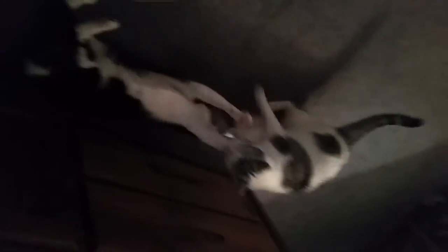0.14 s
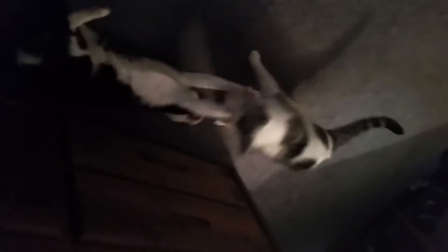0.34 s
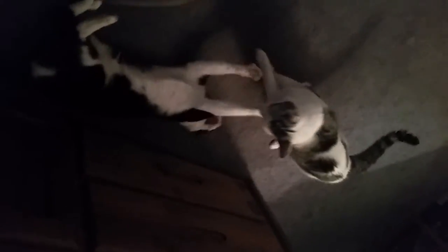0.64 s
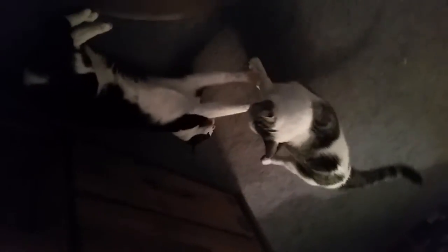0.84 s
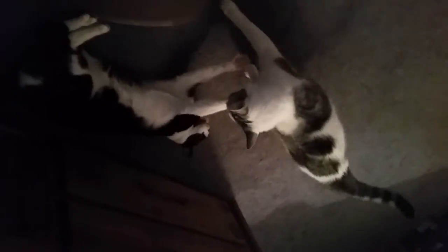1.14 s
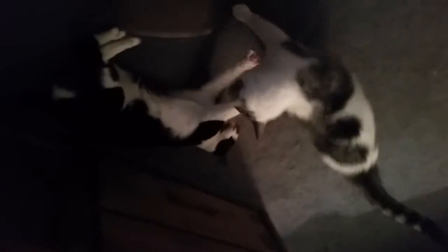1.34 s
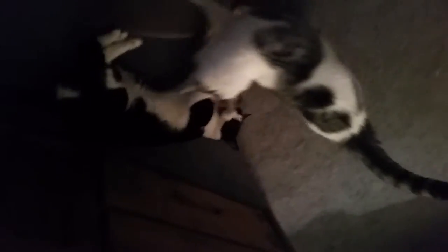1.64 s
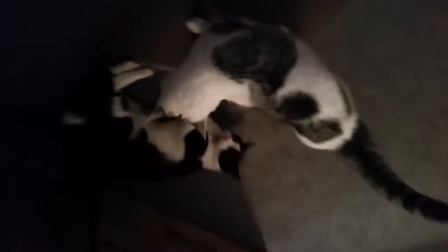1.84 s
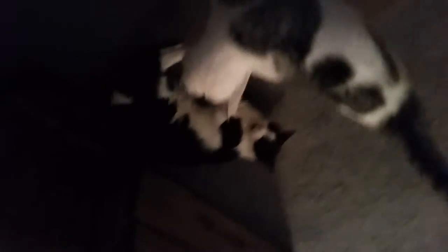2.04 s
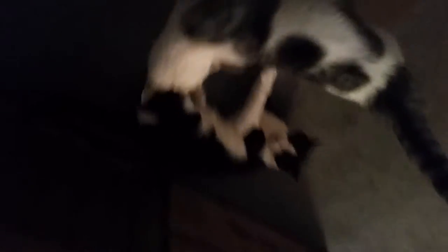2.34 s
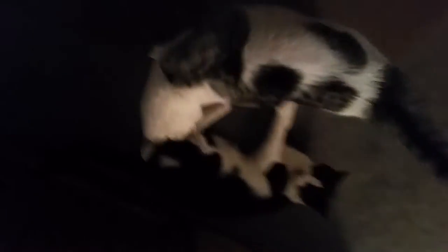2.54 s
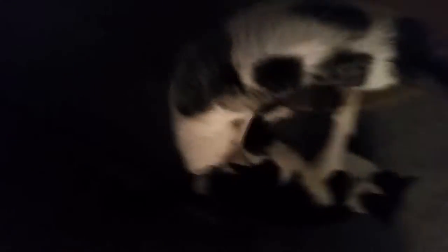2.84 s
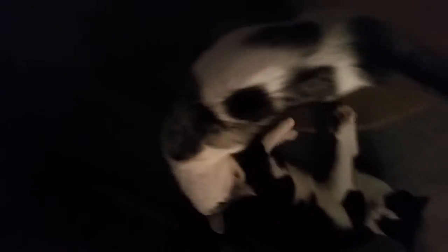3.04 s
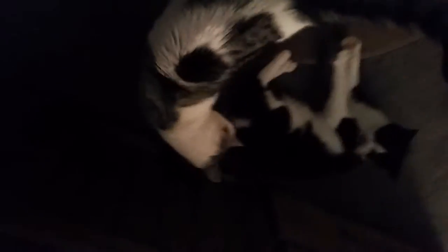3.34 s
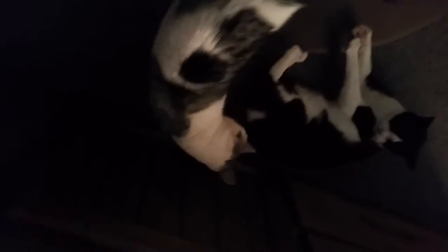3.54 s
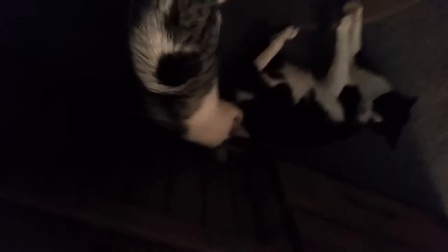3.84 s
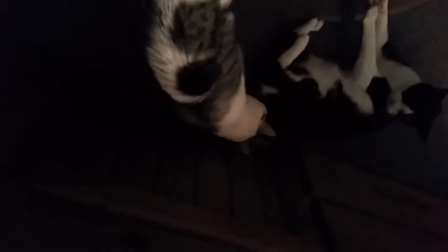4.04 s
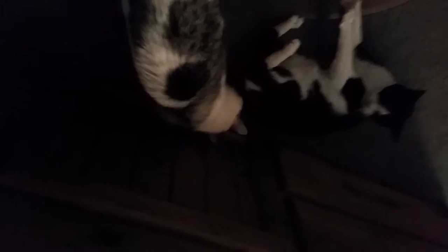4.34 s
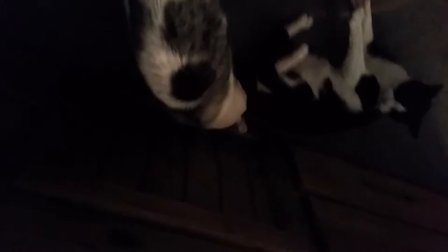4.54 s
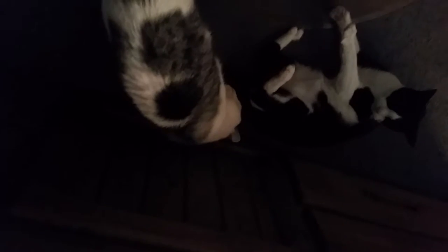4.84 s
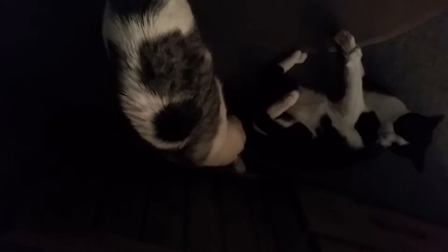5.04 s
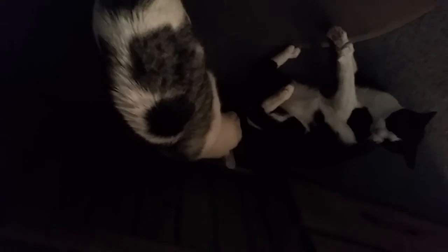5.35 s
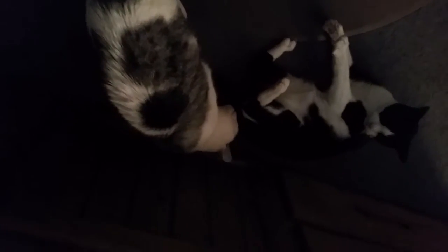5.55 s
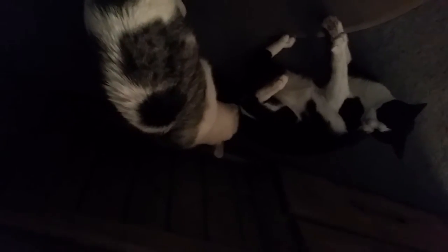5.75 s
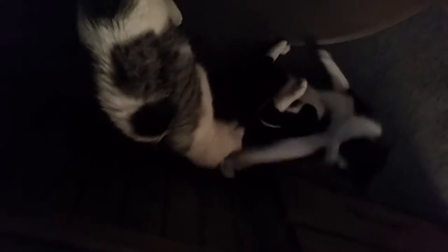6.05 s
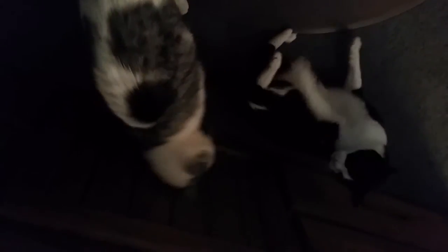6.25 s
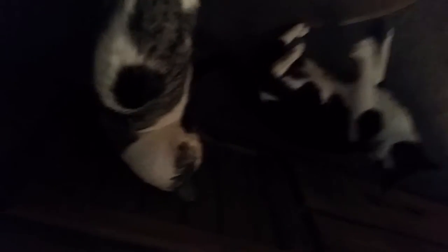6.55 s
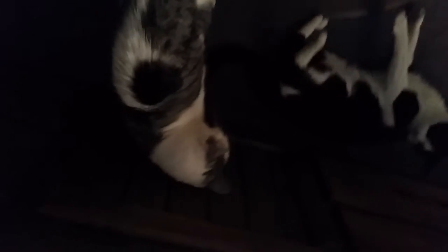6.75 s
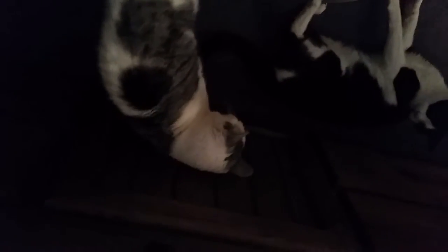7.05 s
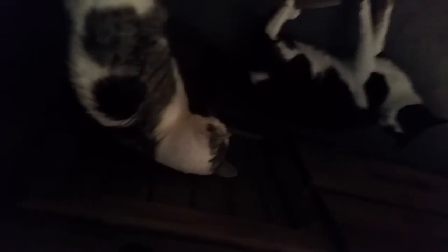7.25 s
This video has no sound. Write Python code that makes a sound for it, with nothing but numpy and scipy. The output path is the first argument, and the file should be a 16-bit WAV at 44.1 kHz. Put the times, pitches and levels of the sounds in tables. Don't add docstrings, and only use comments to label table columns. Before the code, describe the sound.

Loud muffled thumps and popping finger bumps on a hand-held microphone, over faint fur rustles and carpet scrapes of two scuffling cats and a low hum.

```python
import sys
import numpy as np
from scipy import signal
from scipy.fft import rfft, irfft, next_fast_len
from scipy.io import wavfile
from scipy.ndimage import uniform_filter1d

SR = 44100
rng = np.random.default_rng(int(sys.argv[2]) if len(sys.argv) > 2 else 0)


def voltage_ratio(level):
    return 10 ** (np.asarray(level, float) / 20)


def wrap_up_sound(samples):
    columns = np.atleast_2d(samples).T
    tamed = np.clip(columns, -1, 1)
    steps = np.round(tamed * 32767).astype(np.int16)
    wavfile.write(sys.argv[1], SR, steps)


N = 326340
PORT_GAP_SAMPLES = 8


def evened(x):
    return x / np.sqrt(np.mean(x ** 2) + 1e-20)


def read(points, hz):
    f, value = np.transpose(points)
    return np.interp(np.log(hz + 1), np.log(f + 1), value)


def add(mix, start_s, sound):
    part = mix[round(start_s * SR):][:len(sound)]
    part += sound[:len(part)]


def drift(top_hz):
    t = np.arange(0, N, 64) / SR
    waves = sum(np.sin(2 * np.pi * (f * t + rng.random())) / np.sqrt(f)
                for f in np.geomspace(.2, top_hz, 24))
    return np.interp(np.arange(N) / SR, t, evened(waves))


def resonance(x, hz, width_hz):
    return signal.lfilter(*signal.iirpeak(hz, hz / width_hz, SR), x)


def resonance_twice(x, hz, width_hz):
    return resonance(resonance(x, hz, width_hz), hz, width_hz)


def coloured(x, db_at):
    size = next_fast_len(N)
    return irfft(rfft(x, size) * voltage_ratio(db_at(np.fft.rfftfreq(size, 1 / SR))), size)[:N]


def tail(x, t60_s):
    t = np.arange(SR // 2) / SR
    echo = rng.standard_normal((2, len(t))) * voltage_ratio(-60 * t / t60_s) * (t > .004)
    return signal.oaconvolve(x[None], echo / np.linalg.norm(echo[0]), axes=1)[:, :N]


# frequency in Hz, level in dB per Hz.
AIR_SPECTRUM = [(12, -34), (20, -25), (69, -4.5), (123, 2.5), (168, -5), (224, -9.5), (365, -13),
                (520, -22.5), (742, -19.5), (1320, -34.5), (1800, -25.5), (2870, -46), (4000, -42.5),
                (5200, -64), (8800, -120)]
# frequency in Hz, level in dB.
AIR_LEFT_TILT = [(60, 0.5), (150, 0), (380, -5), (950, -2.5), (2380, -6), (5980, -7.5), (15000, 19)]
# frequency in Hz, likeness 0-1.
AIR_LIKENESS = [(60, 0), (130, 0.4), (290, 1), (640, 0.63), (1400, 0.69), (3100, 0), (8000, 0.7)]
# frequency in Hz, width in Hz, level in dB.
STANDING_WAVES = [(227, 17.6, 8.5), (293.1, 12.3, 14), (367, 6.5, 6.5), (376.6, 12, 7), (426, 19.8, 8.5),
                  (772, 17, 9.5), (894, 52, 5.5), (1807, 35, 6.5), (3585, 345, 8)]


def room_tone():
    air_db, hum_hz, hum_db = -47, 120.55, -45
    frames, hz = N // 1024 + 5, np.fft.rfftfreq(4096, 1 / SR)
    a, b, c, d, patches = rng.standard_normal((frames, 2049, 5)).T
    patches = evened(uniform_filter1d(uniform_filter1d(patches, 40, 0), 3, 1))
    modes_db = sum(db / (1 + (2 * (hz - f) / width) ** 2) for f, width, db in STANDING_WAVES)
    hum_gap_db = 14 / (1 + ((hz - hum_hz) / 30) ** 2)

    same = np.clip(read(AIR_LIKENESS, hz), -1, 1)[:, None]
    left = a + 1j * b
    own = c + 1j * d
    late = np.exp(-2j * np.pi * hz * PORT_GAP_SAMPLES / SR)[:, None]
    z = np.array([left, late * (same * left + np.sqrt(1 - same ** 2) * own)])
    z *= voltage_ratio(read(AIR_LEFT_TILT, hz) / 2 * np.array([[1], [-1]]))[:, :, None]
    z *= voltage_ratio((read(AIR_SPECTRUM, hz) + modes_db - hum_gap_db)[:, None] + 0.89 * patches)
    noise = signal.istft(z, nperseg=4096, noverlap=3072)[1][:, :N]
    air = voltage_ratio(air_db + 1.8 * drift(4.6)) * evened(noise)

    hum_phase = 2 * np.pi * np.cumsum(hum_hz + .5 * drift(4)) / SR
    hum = np.sqrt(2) * np.sin(hum_phase) * voltage_ratio(hum_db + 1.4 * drift(8))
    return air + hum * voltage_ratio([[-1.5], [.7]])


# frequency in Hz, level in dB per Hz.
DUCT_HISS = [(3000, -38), (4500, -4), (5400, -5.5), (6100, -14), (6800, -4.5), (7300, -11), (7800, -3.5),
             (8900, -5.5), (9300, -17), (10000, -7.5), (10800, -9), (11400, -4.5), (14400, -2.5)]
# frequency in Hz, level in dB.
DUCT_HISS_RIGHT = [(4500, 8.5), (8900, 6), (9500, -6), (10700, -16), (11400, -1.5)]


def port_noise():
    hiss_db, whine_hz, whine_db = -70.5, 11525, -92
    left, right = rng.standard_normal((2, N))
    left = coloured(left, lambda hz: read([(1500, -53.5), *DUCT_HISS], hz))
    right = coloured(right, lambda hz: read([(1500, -58), *DUCT_HISS], hz) + read(DUCT_HISS_RIGHT, hz))
    whine = np.sin(2 * np.pi * whine_hz * np.arange(N) / SR) * voltage_ratio(whine_db + 2 * drift(6.5))
    return voltage_ratio(hiss_db) * np.array([left, right]) / left.std() + whine


# time in seconds, rustle level in dB.
FUR_LEVEL = [(0, -58), (.9, -62), (1.69, -65), (2.1, -61), (4.0, -55.5), (4.6, -64), (4.85, -57),
             (5.0, -59), (5.2, -62), (6.26, -89), (7.4, -89)]


def rustle():
    s, db = np.transpose(FUR_LEVEL)
    brushing = resonance_twice(rng.standard_normal((2, N)), 2010, 830)
    level = voltage_ratio(np.interp(np.arange(N) / SR, s, db) - 8.0 + 0.6 * drift(13))
    return level * evened(brushing) * voltage_ratio([[-3], [3]])


# start in seconds, length in seconds, level in dB, claw whistle in dB.
PAW_STROKES = [(0.145, 0.058, -59.5, -7.5), (0.278, 0.054, -63, -17), (0.853, 0.034, -64, -6),
               (1.322, 0.067, -67, -23), (1.389, .02, -59, -22), (1.994, 0.14, -51.5, -19),
               (2.02, .006, -50, -24), (2.426, 0.093, -49, -12.5), (2.466, 0.14, -40.5, -19.5),
               (2.64, 0.041, -58, -14), (2.911, 0.054, -46.5, -22), (2.924, 0.14, -39.5, -17),
               (3.277, 0.11, -52, -8), (3.364, 0.049, -53.5, -10), (3.421, 0.059, -53.5, -5),
               (3.483, 0.15, -50, -6), (3.693, 0.13, -54.5, -12), (3.973, 0.13, -47, -13),
               (4.305, 0.14, -58, -13), (4.407, 0.14, -57.5, -17), (4.582, 0.14, -50.5, -15.5),
               (4.687, 0.14, -54.5, -14), (4.856, 0.067, -61.5, -8), (5.51, .03, -62, -20),
               (5.801, 0.0031, -47.5, -12), (6.1, 0.022, -65, -20), (7.11, .02, -68, -20),
               (7.157, .04, -67, -20)]
# frequency in Hz, level in dB per Hz.
FIBRE_SPECTRUM = [(800, -20), (1900, -4.5), (2600, -8.5), (3300, -18), (4040, -7), (5290, -17.5),
                  (6000, -12), (6980, -4), (8680, -2), (10300, -12.5), (11500, -4.5), (13800, -0.5),
                  (15000, -0.5)]
# frequency in Hz, level in dB.
FIBRE_LEFT_TILT = [(2000, -18), (4400, -19), (8000, -26), (15000, -17.5)]


def paws():
    even_db, dig = -46.5, 0.6
    grain_db = 2.0 * rng.standard_normal(N // 40 + 1).repeat(40)[:N]
    fibres = evened(rng.standard_normal(N) * voltage_ratio(grain_db))
    hiss = evened(coloured(fibres, lambda hz: read(FIBRE_SPECTRUM, hz)))
    whistle = evened(resonance_twice(rng.standard_normal(N), 5120, 1000))
    dry = np.zeros(N)
    for s, length_s, db, whistle_db in PAW_STROKES:
        at, u = round(s * SR), np.linspace(-.5, .5, round(length_s * SR))
        now = slice(at, at + len(u))
        stroke = voltage_ratio(db + dig * (db - even_db) * u) * signal.windows.tukey(len(u), .85)
        add(dry, s, stroke * (hiss[now] + voltage_ratio(whistle_db) * whistle[now]))
    wet = voltage_ratio(-12) * tail(dry, 0.9)
    left = 0.15 * np.roll(dry, -PORT_GAP_SAMPLES) + 6.3 * wet[0]
    return np.array([coloured(left, lambda hz: read(FIBRE_LEFT_TILT, hz)), dry + wet[1]])


# start in seconds, tick peak in dB, tearing in dB, tearing length in seconds, centre in Hz.
SNAGS = [
    (.6155, -24, -46, .045, 2400),
    (.6157, -32, -80, .01, 4300),
    (.6243, -36, -62, .01, 2200),
    (.6245, -40, -64, .02, 6900),
    (5.8, -33, -58, .006, 520),
    (5.8005, -41, -57, .005, 1900),
]


def claws():
    dry, t = np.zeros(N), np.arange(SR // 4) / SR
    for s, db, tear_db, length_s, hz in SNAGS:
        tick = resonance_twice(1. * (t == 0), hz, 1.1 * hz)
        grain_db = 1.5 * rng.standard_normal(len(t) // 60 + 1).repeat(60)[:len(t)]
        threads = rng.standard_normal((2, len(t))) * voltage_ratio(grain_db)
        low = evened(resonance(threads[0], .9 * hz, .9 * hz))
        high = evened(resonance(threads[1], 1.9 * hz, 1.9 * hz))
        rasp = low * voltage_ratio(-7 * t / length_s) + high * voltage_ratio(-3 - 12 * t / length_s)
        tear = rasp * voltage_ratio(tear_db - 250 * np.maximum(t - length_s, 0))
        add(dry, s, voltage_ratio(db) * tick / abs(tick).max() + tear)

    squeak_s, squeak_length_s, squeak_hz, squeak_db = .902, .035, 1100, -59
    rub = evened(resonance_twice(rng.standard_normal(round(squeak_length_s * SR)), squeak_hz, 200))
    add(dry, squeak_s, voltage_ratio(squeak_db) * rub * np.hanning(len(rub)))
    dry = signal.lfilter(*signal.butter(4, 5900, fs=SR), dry)
    return dry * voltage_ratio([[-8], [0]]) + voltage_ratio(-14) * tail(dry, .22)


def push(rise_ms, power=2.14):
    u = np.arange(1600) / SR * 1000 / max(rise_ms, .1)
    return (u * np.exp(1 - u)) ** power


def pumped(events):
    out = np.zeros(N)
    for s, db, rise_ms, direction, *_ in events:
        power = max(1.13 + 0.52 * rise_ms, 1)
        swell_ms = rise_ms * np.sqrt(power / 2)
        swell = push(swell_ms, power)
        add(out, s + (rise_ms - swell_ms) / 1000, np.sign(direction) * voltage_ratio(db) * swell)
    return out


# time in seconds, slow squeezing in dB, fine creeping in dB.
HAND_GRIP = [(0.0, -43, -70), (0.27, -43.5, -70), (0.68, -34, -71), (1.01, -43, -67.5), (1.7, -50, -79),
             (1.96, -39.5, -54), (2.04, -35, -50), (2.12, -39, -64), (2.25, -53.5, -79), (2.62, -32.5, -64),
             (2.82, -41, -73), (2.97, -44, -54), (3.1, -41.5, -72), (3.75, -38.5, -68), (4.06, -50, -65),
             (4.35, -47, -82), (4.72, -43, -66.5), (4.99, -32.5, -55.5), (5.06, -44, -71),
             (6.45, -50.5, -87), (7.4, -41.5, -68.5)]


def grip():
    s, squeeze_db, creep_db = np.transpose(HAND_GRIP)
    t = np.arange(N) / SR
    spread_db = np.array([[6.4], [6.4], [3.6]])
    slips_per_s = np.array([[70], [70], [1400]])
    size_db = spread_db * np.minimum(rng.exponential(1, (3, N)), 4)
    size = voltage_ratio(size_db) * rng.choice([-1., 1.], (3, N))
    slips = size * (rng.random((3, N)) < slips_per_s / SR)
    left, right, creep = (evened(signal.oaconvolve(x, push(rise_ms))[:N])
                          for x, rise_ms in zip(slips, (4.5, 6.5, .65)))
    squeeze = voltage_ratio(np.interp(t, s, squeeze_db))
    creep = voltage_ratio(np.interp(t, s, creep_db) + 18.0) * creep
    hand = np.array([voltage_ratio(7.5) * squeeze * left + creep, voltage_ratio(-8.0) * squeeze * right])
    return signal.sosfilt(signal.butter(3, 48, "high", fs=SR, output="sos"), hand)


# start in seconds, push in dB, rise in ms, direction +1 in or -1 out.
FLOOR_JOLTS = [(0.43, -34, 4.2, 1), (2.0235, -11, 3.8, 1), (2.0312, -21, 3.3, -1), (2.4492, -15, 4, 1),
               (2.921, -15, 5, -1), (3.4343, -27, 4.8, -1), (3.4404, -1, 8.7, 1), (3.4432, -4.5, 3.6, 1),
               (3.5145, -9.5, 4.8, 1), (3.9996, -4.5, 3.84, 1), (4.0096, -8, 3.9, 1),
               (4.0178, -19.5, 1.05, -1), (4.0223, -17, 2.9, 1), (4.0329, -13, 3.2, -1),
               (4.3458, -24, 0.89, -1), (4.355, -20, 4.1, 1), (4.74, -28, 2.5, 1), (5.003, -35, 4.5, 1),
               (5.098, -4.5, 6.6, 1), (5.19, -26, 6.4, -1), (5.33, -30, 3.8, 1), (6.72, -15.5, 3.3, 1)]


def jolts():
    return pumped(FLOOR_JOLTS)


CHATTER_CYCLE_MS = 0.75


def press_cycle_ms(rise_ms):
    return 0.71 + 0.23 * rise_ms


# start in seconds, push in dB, rise in ms.
FINGER_NUDGES = [(0.1983, -2, 7.3), (2.0206, -10, 3.6), (2.152, -4.5, 5.6), (2.267, -18, 1.3),
                 (2.412, -20, 1.42), (2.6885, -4, 5), (2.7408, -0.5, 4.6), (2.825, -20, 2.1),
                 (3.0965, -9.5, 3.9), (4.3381, -17.5, 1.4), (4.764, -16.5, 1.67), (5.4155, -16, 1.48),
                 (5.718, 0.5, 7.9), (5.924, -17.5, 2.8), (6.601, -19.5, 2.1), (6.974, -20.5, 1.8),
                 (7.184, -16, 3.3), (7.316, -10.5, 3.4)]


def nudges():
    return [(s, db, ms, 1, db - 28 - 3.5 * ms, press_cycle_ms(ms)) for s, db, ms in FINGER_NUDGES]


def creak():
    start_s, end_s, snaps_per_s, first_db, last_db = 1.88, 2.016, 280, -54, -47
    out = []
    for s in np.arange(start_s, end_s, .001):
        chance, size = rng.random(2)
        if chance < snaps_per_s / 1000:
            snap_db = np.interp(s, (start_s, end_s), (first_db, last_db)) + 6 * (size - .5)
            out.append((s, -60, 1, -1, snap_db, 0.65))
    return out


# start in seconds, push in dB, rise in ms, snap in dB.
FINGER_CATCHES = [(2.464, -21, 0.9, -44), (2.4673, -16, 0.59, -38), (2.4725, -14.5, 0.83, -44),
                  (2.4752, -16, 1.3, -50), (2.481, -15, 1.7, -49), (2.5336, -4.5, 1.63, -39),
                  (2.5401, -6, 3.5, -60), (2.542, -5.5, 1.8, -32), (2.549, -6, 3.5, -60),
                  (2.5514, -5.5, 1.8, -30), (2.5594, -7.5, 3.7, -60), (2.562, -10, 1.5, -30),
                  (2.5723, 1, 3, -36)]


def catches():
    return [(s, db, ms, 1, snap_db, CHATTER_CYCLE_MS) for s, db, ms, snap_db in FINGER_CATCHES]


# time in seconds, slips per second, push in dB, snap in dB.
FINGER_FLUTTERS = [
    [(2.485, 230, -17, -55), (2.505, 243, -13, -61), (2.5123, 206, -6.5, -49), (2.517, 220, -17, -55),
     (2.5258, 220, -8.5, -55)],
    [(2.906, 200, -14, -60), (2.912, 250, -13, -58), (2.916, 300, -15, -60), (2.922, 310, -15.5, -60),
     (2.924, 186, -13, -60), (2.937, 223, -5.5, -53), (2.9442, 310, -18.5, -58)],
]


def flutter():
    uneven_db, uneven_s = 1.2, .00015
    out = []
    for rows, direction in zip(FINGER_FLUTTERS, (1, -1)):
        s, rate, db, snap_db = np.transpose(rows)
        t = np.arange(s[0], s[-1], 1 / SR)
        rate = np.interp(t, s, rate)
        slips_left = np.floor(np.cumsum(rate[::-1])[::-1] / SR)
        for k in np.flatnonzero(np.diff(slips_left, append=-1)):
            chance, late = rng.standard_normal(2)
            push_db = np.interp(t[k], s, db) + uneven_db * chance
            let_go_db = np.interp(t[k], s, snap_db) + 2 * chance
            out.append((t[k] + uneven_s * late, push_db, 310 / rate[k], direction, let_go_db,
                        CHATTER_CYCLE_MS))
    return out


# start in seconds, pull in dB, rise in ms, snap in dB.
FINGER_PEELS = [(0.803, -13.5, 2.1, -50), (0.983, -15.5, 2.65, -53), (1.021, -13, 3.1, -49),
                (1.0816, -13.5, 2.6, -55), (1.1796, -15.5, 2.5, -57), (1.2421, -15, 2.4, -55),
                (1.2632, -14, 2.14, -57), (1.782, -4.5, 2.1, -55), (1.859, -24, 1.4, -54),
                (1.8702, -25, 1.4, -55), (1.882, -23, 0.79, -52), (1.885, -13.5, 1.9, -55),
                (1.908, -4, 5, -55), (2.025, 0, 4.7, -48), (2.0275, 4, 3.2, -39), (2.033, -7, 5.7, -50),
                (2.0381, -6.5, 1.17, -26.5), (2.04, 6.5, 3.5, -33), (2.047, -10, 4.8, -55),
                (2.0498, -8, 2.5, -25), (2.0528, 1, 1.95, -41), (2.0653, 1, 3.6, -22),
                (2.0813, -6, 1.5, -29), (2.9512, -24, 1.9, -46), (2.9565, -9, 2.4, -48),
                (2.9612, -19, 1.1, -48), (2.968, -28, 1.7, -44), (2.9873, -15, 2.3, -56),
                (2.9919, -13, 2.8, -58), (3.0025, -0.5, 5.1, -53), (3.021, -4, 3.4, -48),
                (3.032, -4, 3.5, -55), (3.04, -7, 4.7, -55), (3.0664, -5, 4.4, -55), (6.219, -9, 4.5, -55),
                (6.8933, -4.5, 4.5, -52), (7.155, -16.5, 2.5, -58)]


def peels():
    return [(s, db, ms, -1, snap_db, .66 + 0.041 * ms) for s, db, ms, snap_db in FINGER_PEELS]


# start in seconds, push in dB, rise in ms, snap in dB.
FINGER_PRESSES = [(0.5083, -33, 5.5, -34.5), (0.5267, -9, 1.4, -45), (0.5362, -3, 2.6, -27),
                  (0.556, -1.1, 1.32, -29), (0.5831, -14, 0.88, -35), (0.5866, -1, 0.87, -23),
                  (0.6776, -13, 0.76, -40), (.6808, 3, 1.4, -18.5), (0.7012, -24, 0.92, -49),
                  (0.7027, -10.5, 1.7, -34), (0.7116, 1, 1.18, -34), (0.7128, 7, 2.43, -22),
                  (0.7298, -15, 0.92, -45), (0.7306, -10, 2, -33), (0.7396, 8, 2.74, -20.5),
                  (.759, -20, 0.77, -45), (0.7598, -13, 0.79, -38), (0.7729, 8, 2.63, -18.5),
                  (4.8637, 1, 4.7, -58), (4.8729, 3, 3.65, -39), (4.8843, -0.5, 2.63, -49),
                  (4.902, 1, 5.1, -59), (4.9352, -0.5, 3.6, -47), (4.9593, -14, 1.9, -56),
                  (4.9631, -4, 2.3, -61), (4.978, -17, 1.7, -56), (4.9804, -1, 2.74, -52),
                  (4.9918, -15, 2.4, -49), (4.997, -7, 2, -52), (5.0372, -16, 1.3, -52),
                  (5.0394, -2.5, 1.84, -33), (5.049, 9.5, 3.6, -21.5), (5.0595, -9, 2.1, -31),
                  (5.061, -10, 1.3, -21.5), (5.0619, -15, 1.2, -35), (5.0632, 6, 2.34, -45),
                  (5.0801, -7.5, 0.55, -27)]


def presses():
    return [(s, db, ms, 1, snap_db, press_cycle_ms(ms)) for s, db, ms, snap_db in FINGER_PRESSES]


def snaps(slips):
    out, t = np.zeros(N), np.arange(300) / SR
    for s, _, _, direction, db, cycle_ms in slips:
        lag, echo = rng.random(2)
        u = t * 1000 / max(cycle_ms, .3)
        onset = np.sin(np.pi * np.minimum(1.83 * u, .5)) ** 2
        ring = direction * voltage_ratio(db + 9.5 - 20 * u) * np.sin(2 * np.pi * u) * onset
        at_s = s + 0.00077
        add(out, at_s - .0004, ring)
        add(out, at_s + 0.0003 + 0.0003 * lag, 0.5 * echo * ring)
    return out


def low_cut(x):
    w = 2 * np.pi * 130
    ringing = signal.lfilter(*signal.bilinear([1, 0, 0], [1, w / 0.83, w * w], SR), x)
    return signal.lfilter(*signal.butter(1, 90, "high", fs=SR), ringing)


def handling():
    slips = presses() + peels() + nudges() + catches() + flutter() + creak()
    pumping = np.array([pumped(slips), jolts()])
    soft = signal.lfilter(*signal.butter(2, 1050, fs=SR), pumping)
    bare = low_cut(soft + snaps(slips) * np.array([[1], [0]])) + grip()
    muffled = signal.lfilter(*signal.butter(5, 2610, fs=SR), voltage_ratio(-2.5) * bare)
    leak = voltage_ratio(-13) * signal.lfilter(*signal.butter(3, 4600, fs=SR), bare)
    return muffled + leak


def scene():
    return room_tone() + port_noise() + rustle() + paws() + claws() + handling()


def roll_off(x):
    return signal.sosfilt(signal.butter(12, 15690, fs=SR, output="sos"), x)


def record(dry):
    rounded = 1.463 * np.tanh(dry / 1.435)
    band_limit = signal.firwin(511, 14560, window=("kaiser", 9), fs=SR)
    limited = signal.oaconvolve(rounded, band_limit[None], "same")
    return roll_off(limited)


dry = scene()
out = record(dry)
wrap_up_sound(out)
```